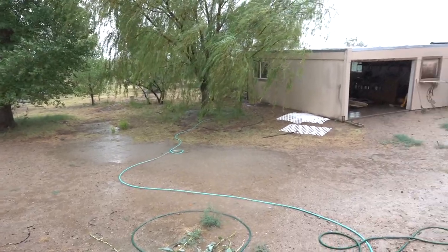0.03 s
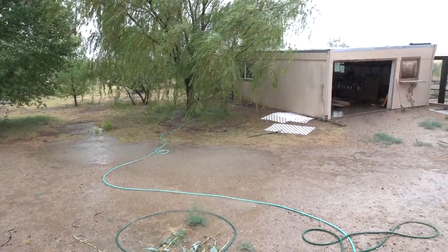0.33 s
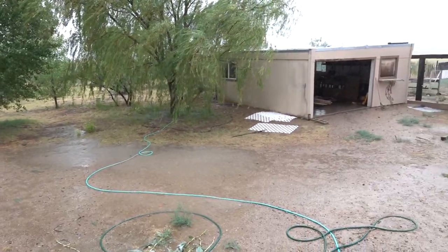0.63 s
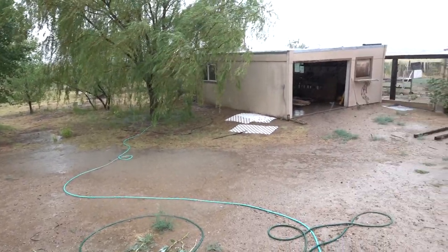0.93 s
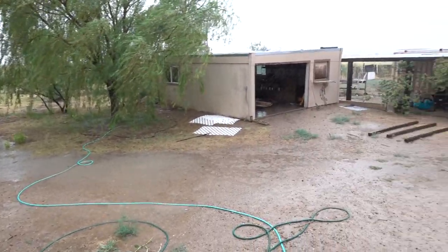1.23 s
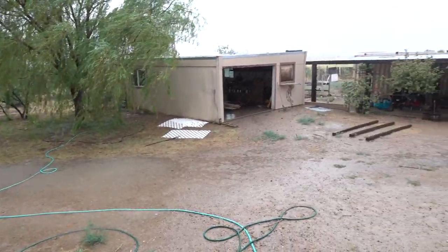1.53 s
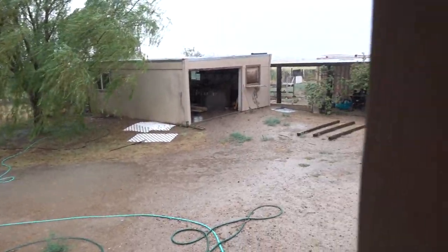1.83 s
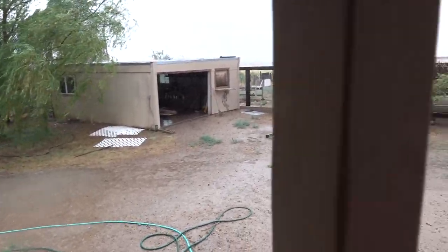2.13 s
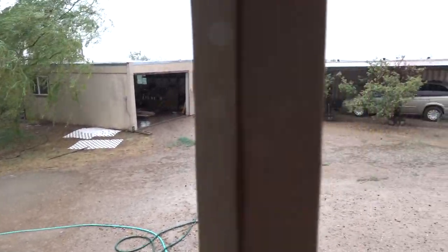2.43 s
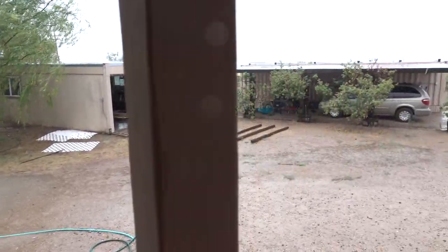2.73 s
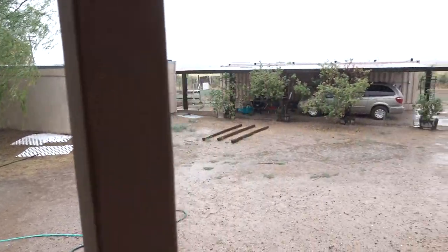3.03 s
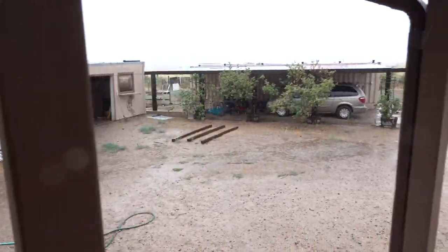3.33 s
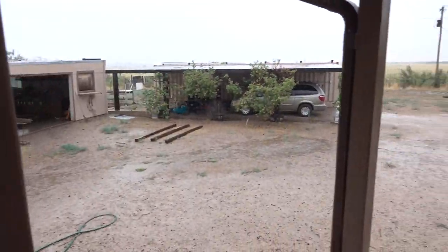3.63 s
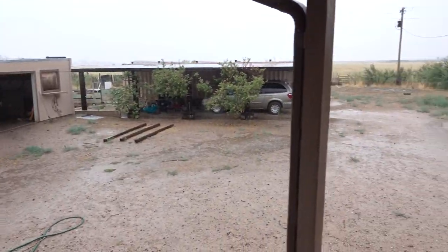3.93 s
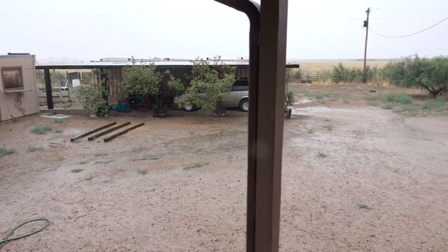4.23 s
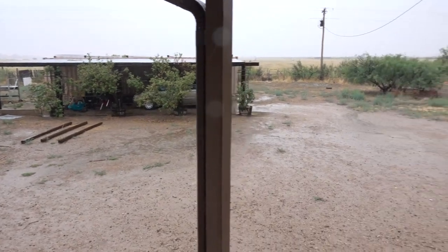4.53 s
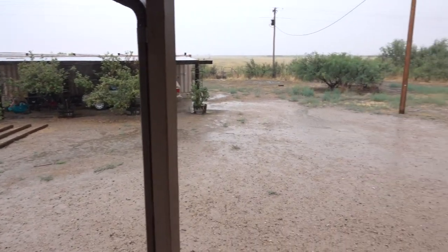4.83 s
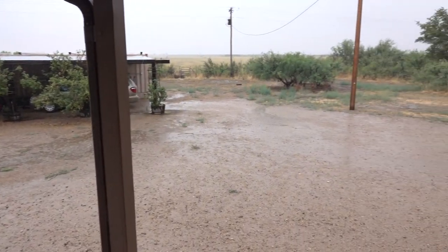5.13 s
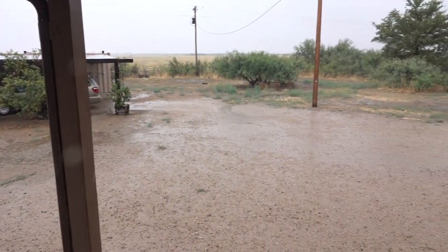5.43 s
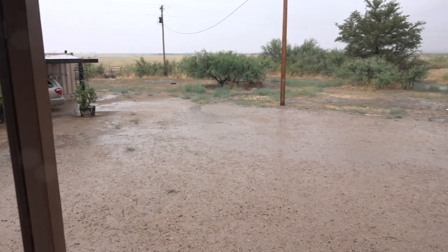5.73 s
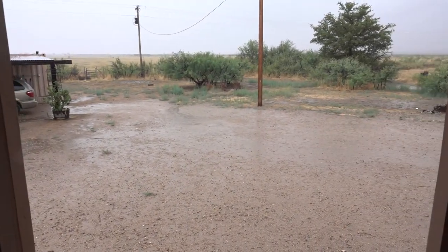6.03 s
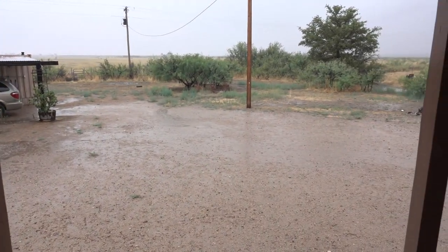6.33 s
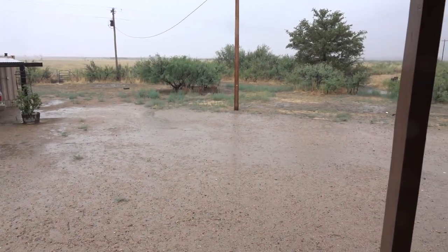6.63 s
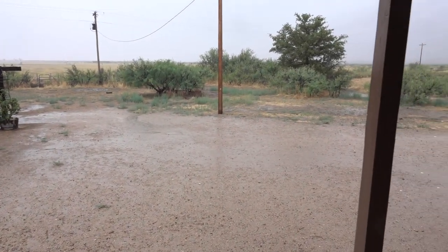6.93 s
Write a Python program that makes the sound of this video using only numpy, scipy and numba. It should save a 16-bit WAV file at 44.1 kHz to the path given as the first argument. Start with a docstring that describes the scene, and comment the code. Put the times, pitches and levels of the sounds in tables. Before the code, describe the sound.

From beneath a porch, rain makes a wide, even hiss on the wet ground of a yard. Wind buffets the microphone twice, first in a short, thumping gust and then in a longer, fluttering rumble, each pushing the rain down before it creeps back. The wind then eases to soft puffs and occasional bumps, and small, faint drips tick close by.

```python
"""Steady rain on an open dirt yard, heard from under a porch on a camera's stereo microphone.
Half a second in, a gust pushes eddies over the two ports: the faster the air, the louder and brighter
they rumble. After a lull, a longer gust blows from about 2.5 to 4 s. In both, the camera's gain control
ducks the rain, then lets it creep back. Lighter puffs follow, and the nearer splashes, sparse at first,
come more often."""
import sys
import numpy as np
from scipy import signal
from scipy.fft import rfft, irfft, next_fast_len
from scipy.io import wavfile
from scipy.ndimage import uniform_filter1d
from numba import njit

SR = 44100
rng = np.random.default_rng(int(sys.argv[2]) if len(sys.argv) > 2 else 0)


def dump(signal):
    """Clip the signal to [-1, 1] and save it as 16-bit WAV at the path in sys.argv[1]."""
    limited = np.clip(np.atleast_2d(signal).T, -1, 1)
    pcm = np.round(limited * 32767).astype(np.int16)
    wavfile.write(sys.argv[1], SR, pcm)


N = 316638
TIME = np.arange(N) / SR


def undb(db):
    """Decibels to gain."""
    return np.exp(np.asarray(db) * np.log(10) / 20)


def unit(x):
    """Scale to rms 1."""
    return x / np.sqrt(np.mean(x ** 2))


def colour(x, points):
    """Filter by a spectrum of (Hz, dB) points."""
    hz, db = np.transpose(points)
    size = next_fast_len(N, True)
    bin_hz = np.maximum(np.fft.rfftfreq(size, 1 / SR), 1)
    gain = undb(np.interp(np.log(bin_hz), np.log(hz), db))
    return irfft(rfft(x, size) * gain, size)[..., :N]


def smooth(x, seconds):
    """Triangular running mean."""
    size = max(int(seconds * SR), 1)
    return uniform_filter1d(uniform_filter1d(x, size), size)


def waver(rate):
    """A smooth random curve of rms 1 that changes `rate` times a second."""
    steps = rng.standard_normal(N)[(TIME * rate).astype(int)]
    return unit(smooth(steps, 1 / rate))


def impacts(rate, spread_db):
    """Random pushes and pulls, `rate` a second, whose sizes scatter in dB."""
    chance, size = rng.uniform(-1, 1, N), rng.standard_normal(N)
    return (np.abs(chance) < rate / SR) * np.sign(chance) * undb(spread_db * size)


def highpass(x, hz, order):
    """Roll off what lies under hz."""
    return signal.sosfilt(signal.butter(order, hz, "high", fs=SR, output="sos"), x)


@njit
def lowpass(x, hz, damping):
    """Two-pole low-pass whose corner moves every sample."""
    y, band_state, low_state = np.empty(len(x)), 0., 0.
    for i in range(len(x)):
        g = np.tan(np.pi * hz[i] / SR)
        band = (band_state + g * (x[i] - low_state)) / (1 + g * (g + damping))
        y[i] = low_state + g * band
        band_state, low_state = 2 * band - band_state, 2 * y[i] - low_state
    return y


def patter(drop_rate, spread_db, tick_db):
    """Countless drops far out in the yard merge into a wash; nearer ones tick in the treble."""
    ticks = unit(highpass(impacts(drop_rate, spread_db), hz=1850, order=1))
    wash = unit(rng.standard_normal(N))
    return unit(wash + undb(tick_db) * ticks)


# The whole yard's tone from under the porch. Each row: frequency in Hz, relative level in dB.
YARD_SPECTRUM = [(100, -10), (240, 4.5), (400, -1.5), (720, 1.66), (1250, -1.5), (2500, -7.5),
                 (4400, -14.5), (6500, -18), (8500, -17), (12300, -13.5), (15500, -17)]
# How wide the rain sits in stereo. Each row: frequency in Hz, side minus mid in dB.
YARD_WIDTH = [(400, -14), (700, -10), (1290, -6.5), (2380, -5), (4400, -2.5), (8120, -2), (13000, -5)]
# How hard it rains beyond the porch. Each row: time in seconds, level in dB.
RAIN_LEVELS = [(0, -42), (.5, -44), (1.5, -44), (2.5, -44.5), (4.0, -43), (5.7, -44), (6.8, -43)]
def rain(left_db, sway_db, roar_sway_db):
    """Rain from all round, alike at both ports in the lows; the far roar wavers apart from the spray."""
    mid = patter(drop_rate=3000, spread_db=4.0, tick_db=-4.5)
    side = colour(patter(drop_rate=3000, spread_db=3.5, tick_db=2.5), YARD_WIDTH)
    stereo = unit(colour(np.array([mid + side, mid - side]), YARD_SPECTRUM))
    near_spray = highpass(stereo, hz=1600, order=1)
    far_roar = (stereo - near_spray) * undb(roar_sway_db * waver(rate=10))
    level_db = np.interp(TIME, *np.transpose(RAIN_LEVELS)) + sway_db * waver(rate=30)
    balance_db = np.array([[left_db], [-left_db]]) / 2
    return (near_spray + far_roar) * undb(level_db + balance_db)


# Drops on the wet ground near the porch.
# Each row: start in seconds, relative peak in dB, band centre in Hz, band width in Hz.
NEAR_DROPS = [(.045, -31, 2800, 3000), (0.439, -33, 2290, 2980), (1.970, -37, 5440, 2500),
              (3.186, -35, 10000, 7000), (4.307, -37.5, 12700, 5000), (4.346, -36, 11500, 5850),
              (5.369, -34, 13400, 6000), (5.440, -36, 13200, 5000), (5.508, -34, 12200, 4000),
              (5.689, -38, 4460, 716), (6.434, -36, 10100, 6000), (6.557, -41, 7800, 2500),
              (6.845, -33.5, 11200, 3960)]
def splashes(rise_s, decay_s, level_db):
    """Each near drop bursts into a short fizz of droplets; one with a narrow band plinks."""
    out = np.zeros((2, N))
    size = 4096
    age, hz = np.arange(size) / SR, np.fft.rfftfreq(size, 1 / SR)
    for start, db, centre_hz, width_hz in NEAR_DROPS:
        noise = rng.standard_normal((3, size))
        stereo = noise[0] + 0.5 * noise[1:]  # mostly the same at both ports
        band = 1 / (1 + (2 * (hz - centre_hz) / width_hz) ** 2)
        fizz = irfft(rfft(stereo) * band)
        fizz *= (1 - np.exp(-age / rise_s)) ** 2 * np.exp(-age / decay_s)
        fizz *= undb(db + level_db) / np.abs(fizz).max()
        i = int(start * SR)
        out[:, i:i + size] += fizz[:, :N - i]
    return out


# Single large eddies right on the microphone.
# Each row: time of the crossing in seconds, peak in dB, pitch in Hz.
LONE_EDDIES = [(0.682, -20, 202), (.746, -11, 283), (0.898, -17.5, 242), (1.052, -17.5, 254),
               (2.116, -26, 75.4), (3.111, -19.5, 243), (4.059, -15, 200), (4.112, -18.5, 248),
               (4.923, -22, 143), (4.985, -26, 108), (5.488, -20.5, 73), (6.83, -22.5, 109),
               (7.083, -23.5, 91)]
def thumps():
    """A lone eddy sucks, then pushes, as it crosses the microphone."""
    out = np.zeros(N)
    for crossing, db, hz in LONE_EDDIES:
        phase = 2 * np.pi * hz * (TIME - crossing)
        out += undb(db) * phase * np.exp((1 - phase ** 2) / 2)
    return out


# The slow rise and fall of the air under the porch. Each row: time in seconds, strength in dB.
PORCH_BREEZE = [(0, -26), (.45, -27), (.72, -20.5), (.94, -37), (1.5, -36.5), (1.8, -34.5), (2.03, -47),
                (2.3, -44.5), (2.5, -24), (3.55, -19), (3.87, -28.5), (4.2, -25.5), (4.45, -30.5),
                (4.6, -38), (5.15, -53.5), (5.7, -44.5), (6.3, -31.5), (6.7, -43)]
# Puffs that reach the microphone. Each row: start in seconds, hold in seconds, strength in dB.
PORCH_PUFFS = [(.485, 0.29, -19), (0.542, 0.055, -16), (0.656, 0.067, -16), (0.77, 0.103, -21),
               (0.953, 0.19, -27), (1.215, .15, -33.5), (1.578, 0.34, -35), (2.09, 0.029, -31.5),
               (2.199, 0.032, -34.5), (2.339, 0.14, -36), (2.468, 0.035, -17.5), (2.566, 0.018, -15),
               (2.615, 0.065, -14), (2.831, 0.16, -17), (3.195, 0.028, -16.5), (3.294, 0.16, -16),
               (3.604, 0.159, -16.5), (3.91, 0.084, -27), (4.035, 0.083, -26.5), (4.46, 0.039, -29.5),
               (4.675, 0.062, -35), (4.859, 0.16, -36.5), (5.77, 0.066, -33), (6.107, .05, -33.5),
               (6.204, .12, -26.5), (6.772, .06, -34.5), (6.9, 0.035, -33.5), (7.03, .14, -34)]
def gusts(attack_s, release_s):
    """Strength of the wind in dB: each puff swells quickly, holds and dies away on top of the breeze."""
    power = undb(np.interp(TIME, *np.transpose(PORCH_BREEZE))) ** 2
    for start, hold, db in PORCH_PUFFS:
        age = TIME - start
        swell = np.clip(age / attack_s, 0, 1)
        fade = np.exp(-np.maximum(age - hold, 0) / release_s)
        power += (undb(db) * swell * fade) ** 2
    return 10 * np.log10(power)


def eddies(corner_hz, bottom_hz, rate, spread_db, damping):
    """Pressure bumps as eddies pass a port, shorter at a high corner; their running rms is held at 1."""
    bumps = highpass(impacts(rate, spread_db), bottom_hz, order=1) + 1e-9
    for _ in range(2):
        bumps = lowpass(bumps, np.minimum(corner_hz, SR / 10), damping)
    bumps = highpass(bumps, hz=43.0, order=2)
    power = np.abs(smooth(bumps ** 2, seconds=0.023))
    return bumps / np.sqrt(power + 1e-18)


# How sharply the air grazes the ports as the camera turns.
# Each row: time in seconds, shift of the air's speed in octaves.
PORT_GRAZING = [(0, -0.057), (1.4, -0.13), (3.4, 0.2), (3.7, -0.021), (4.1, .35), (4.6, -0.021),
                (7.1, -0.3)]
def wind(flutter_db, flutter_rate, opposed):
    """Large eddies press on both ports alike; small ones hit each port alone and take over in fast air."""
    gust_db = gusts(attack_s=0.0232, release_s=0.026)
    steadiness = 1 + undb(gust_db + 14)  # a full gust blows more evenly than a lull
    strength_db = gust_db + flutter_db * waver(flutter_rate) / steadiness
    grazing = np.interp(TIME, *np.transpose(PORT_GRAZING))
    octaves = np.maximum(strength_db + 26, -16) / 15 + grazing
    speed = 2 ** octaves  # 1 in a moderate breeze
    large = eddies(212 * speed ** 0.48, bottom_hz=93, rate=380 * speed, spread_db=4, damping=1.64)
    small = np.zeros((2, N))
    for port in range(2):
        bumps = eddies(320 * speed, bottom_hz=280, rate=480 * speed, spread_db=5.5, damping=1.83)
        flicker_db = 2 * waver(rate=130)
        small[port] = highpass(bumps * undb(flicker_db), hz=88, order=1)
    small = small - opposed * small[::-1]  # a small eddy that pushes one port sucks at the other
    small_share = np.clip(0.45 * speed ** 0.59, 0, .85)
    rumble = np.sqrt(1 - small_share) * large + np.sqrt(small_share) * small
    return rumble * undb(strength_db + 0.5)


def scene():
    """Rain across the yard, splashes nearer the porch, wind right on the microphone."""
    yard = rain(left_db=0.5, sway_db=0.56, roar_sway_db=0.67)
    yard += splashes(rise_s=0.0032, decay_s=0.0095, level_db=-3.5)
    return yard + thumps() + wind(flutter_db=2.0, flutter_rate=75, opposed=0.076)


def gain_control(x, limit_db, release_s, slow_attack_s, creep_db_per_s):
    """A quick limiter, and a slow stage that sinks after it and lets the gain creep back."""
    hop = 88
    step_s = hop / SR
    power = smooth(np.mean(x ** 2, axis=0), seconds=0.016)[::hop]
    level_db = 10 * np.log10(power + 1e-12)
    quick_db, slow_db, cut_db = 0, 0, []
    for over_db in np.maximum(level_db - limit_db, 0):
        quick_db = max(over_db, quick_db * np.exp(-step_s / release_s))
        if quick_db > slow_db:
            slow_db += (quick_db - slow_db) * step_s / slow_attack_s
        else:
            slow_db -= min(slow_db, creep_db_per_s * step_s)
        cut_db.append(max(quick_db, slow_db))
    return x * undb(-np.interp(TIME, TIME[::hop], cut_db))


def record(dry):
    """The camera rides its gain and cuts the treble above 15650 Hz."""
    held = gain_control(dry, limit_db=-25.0, release_s=0.064, slow_attack_s=0.62, creep_db_per_s=2.5)
    top_cut = signal.ellip(12, .1, 80, 15650, fs=SR, output="sos")
    return signal.sosfilt(top_cut, held)


dry = scene()
out = record(dry)
dump(out)
```